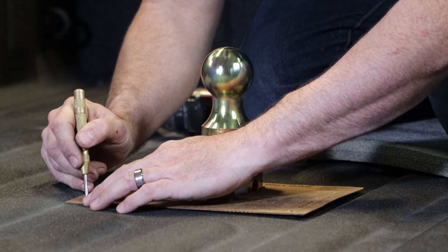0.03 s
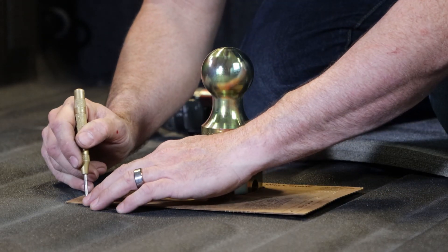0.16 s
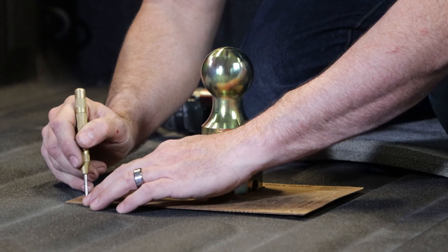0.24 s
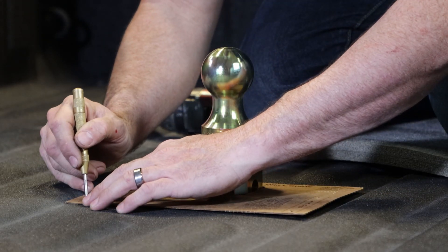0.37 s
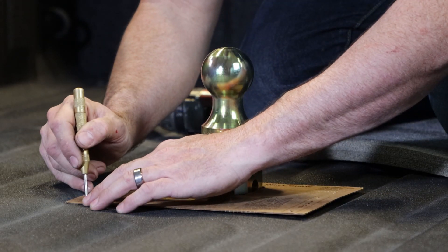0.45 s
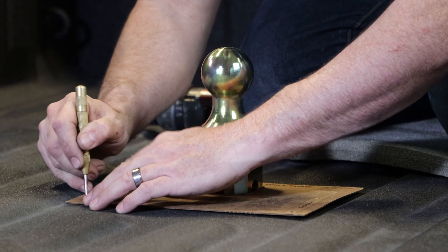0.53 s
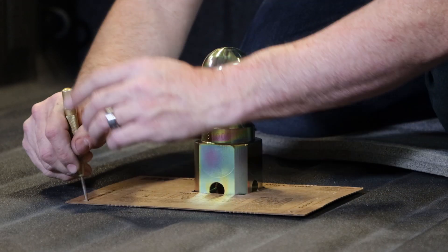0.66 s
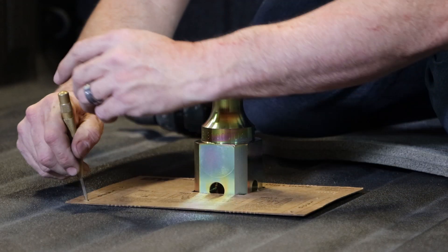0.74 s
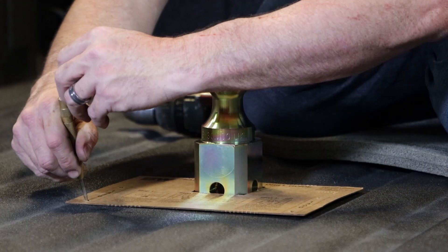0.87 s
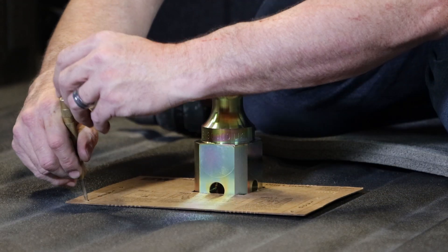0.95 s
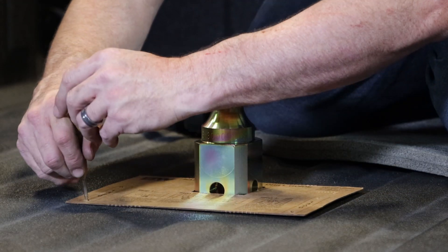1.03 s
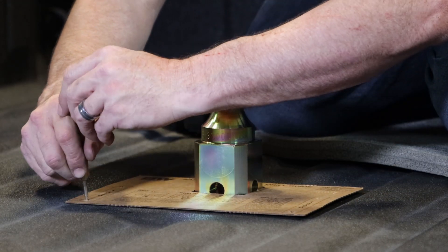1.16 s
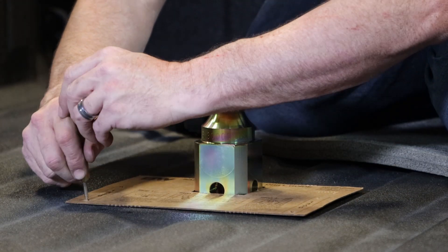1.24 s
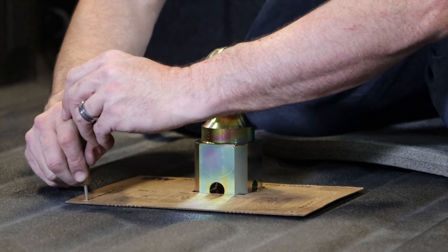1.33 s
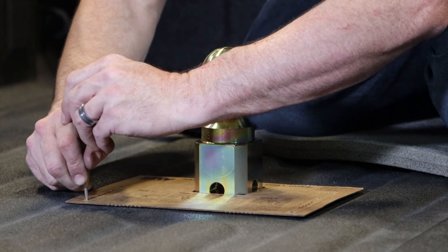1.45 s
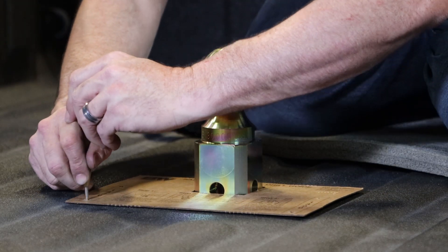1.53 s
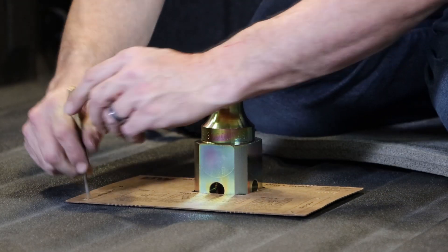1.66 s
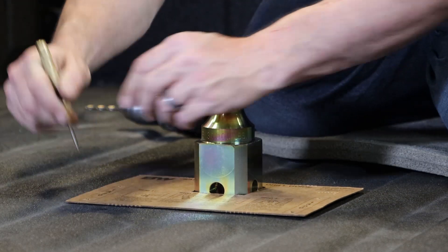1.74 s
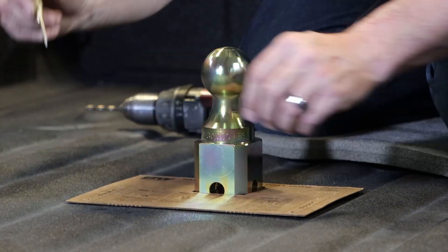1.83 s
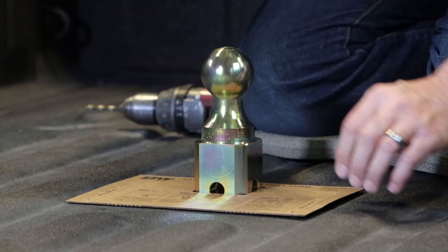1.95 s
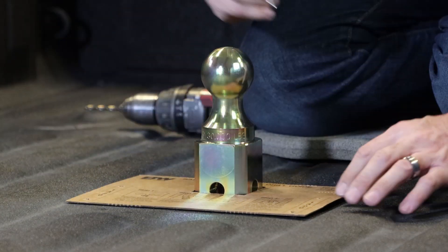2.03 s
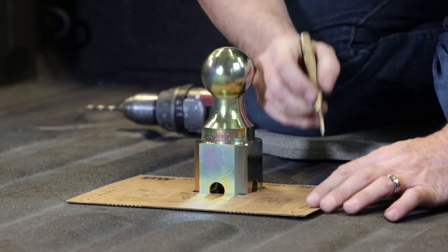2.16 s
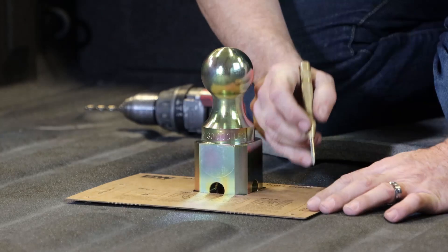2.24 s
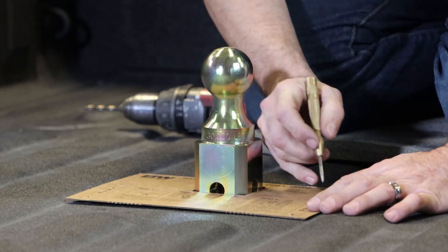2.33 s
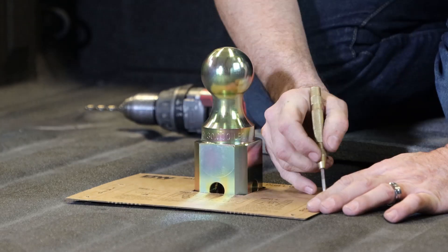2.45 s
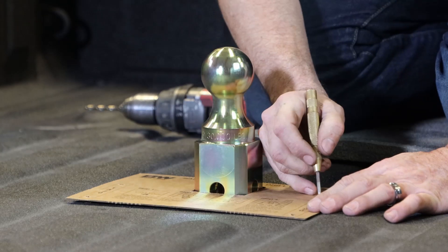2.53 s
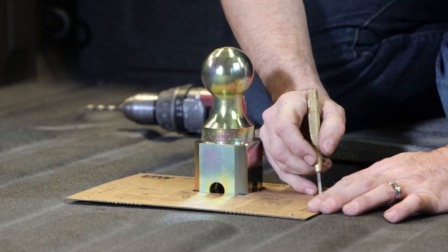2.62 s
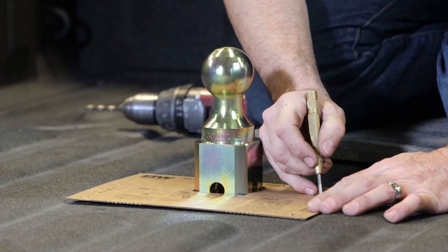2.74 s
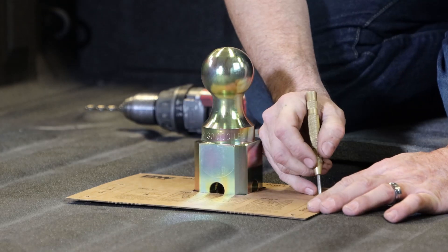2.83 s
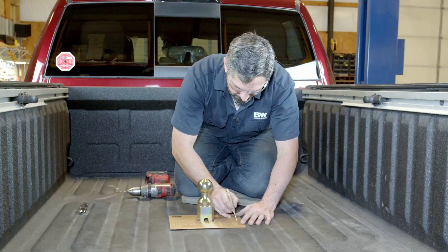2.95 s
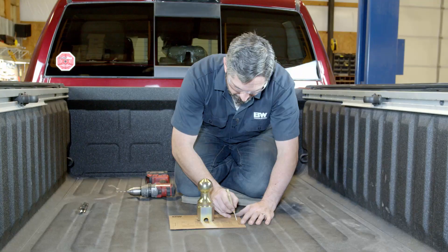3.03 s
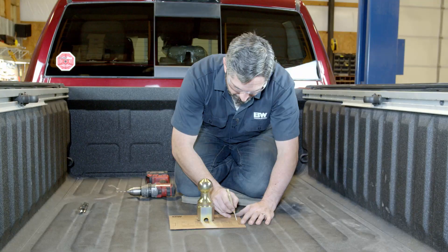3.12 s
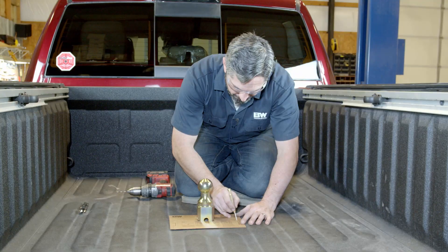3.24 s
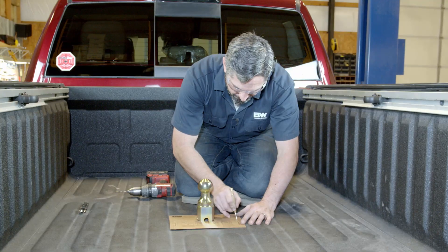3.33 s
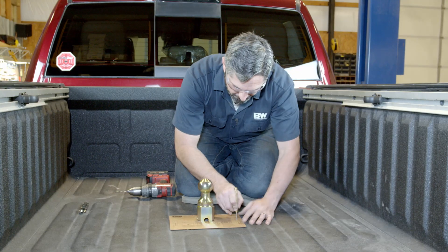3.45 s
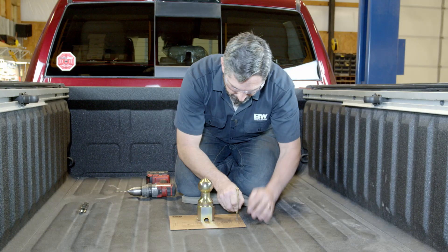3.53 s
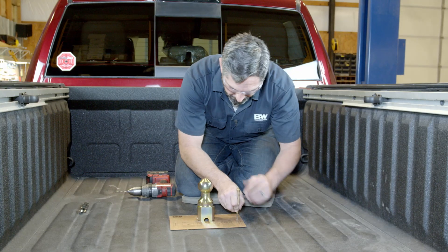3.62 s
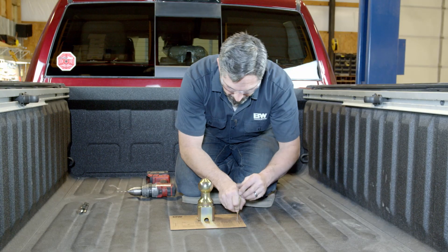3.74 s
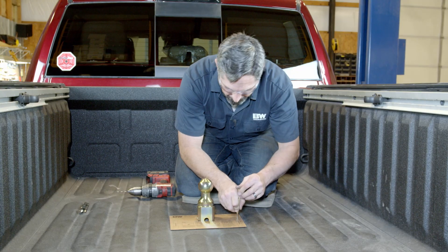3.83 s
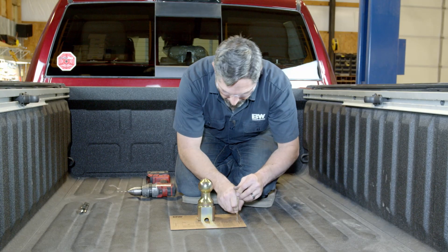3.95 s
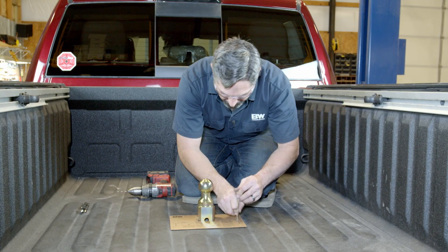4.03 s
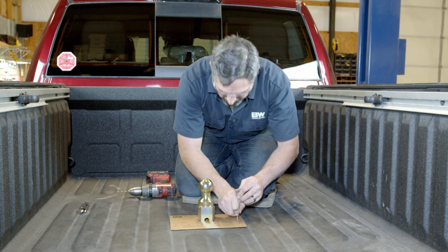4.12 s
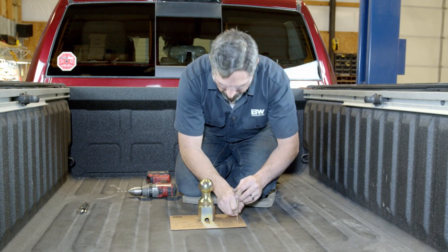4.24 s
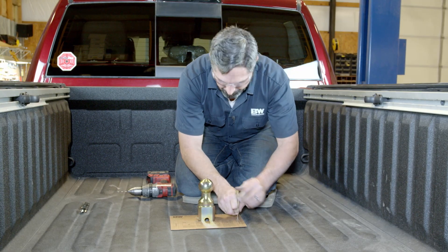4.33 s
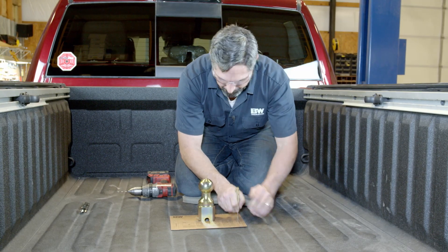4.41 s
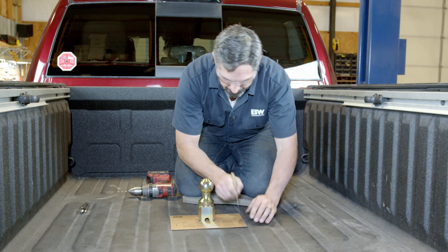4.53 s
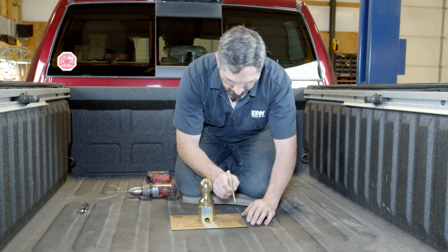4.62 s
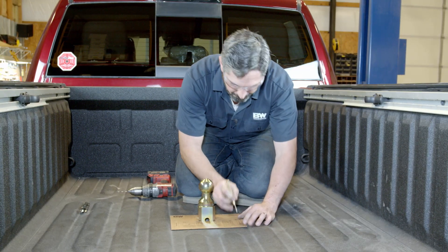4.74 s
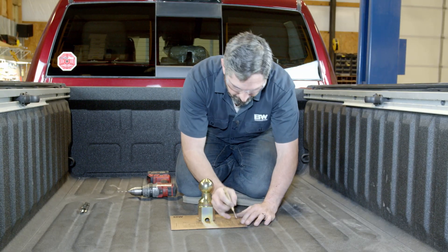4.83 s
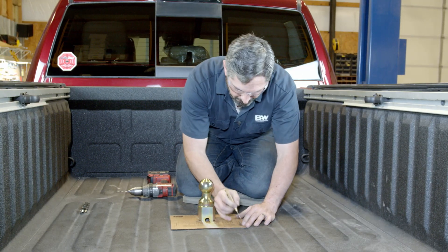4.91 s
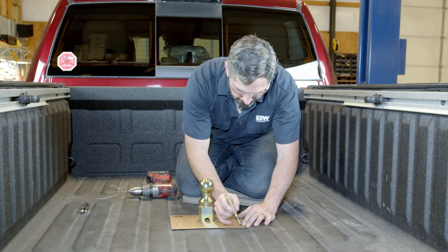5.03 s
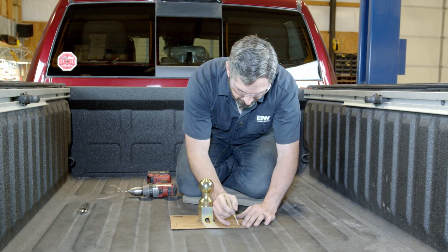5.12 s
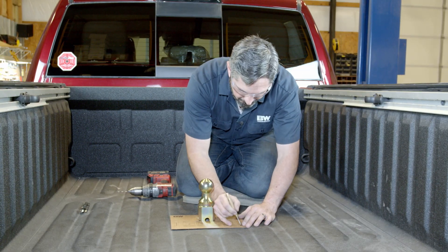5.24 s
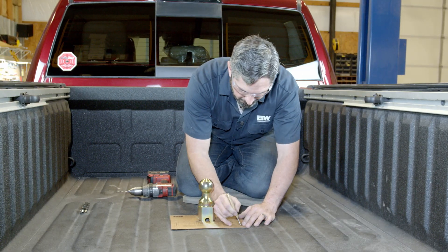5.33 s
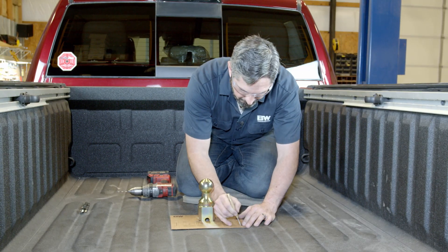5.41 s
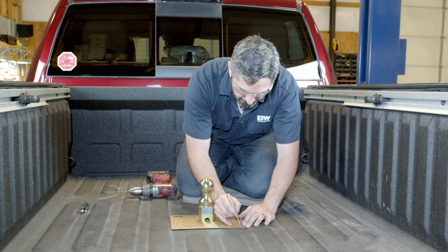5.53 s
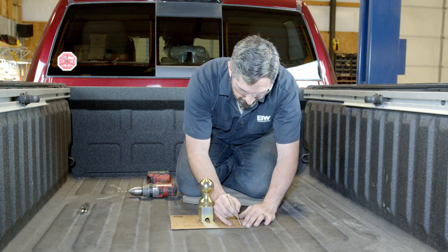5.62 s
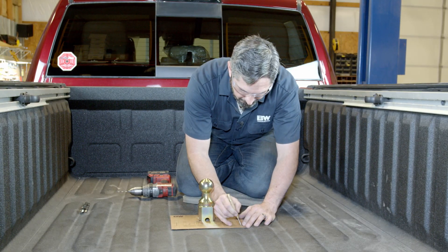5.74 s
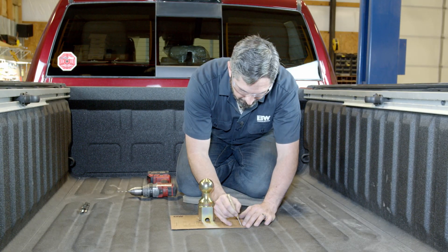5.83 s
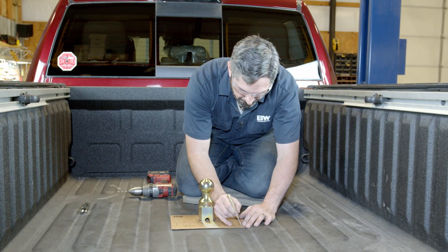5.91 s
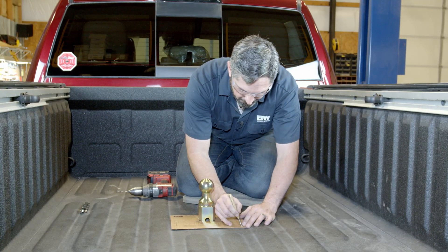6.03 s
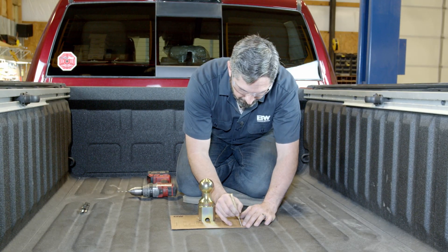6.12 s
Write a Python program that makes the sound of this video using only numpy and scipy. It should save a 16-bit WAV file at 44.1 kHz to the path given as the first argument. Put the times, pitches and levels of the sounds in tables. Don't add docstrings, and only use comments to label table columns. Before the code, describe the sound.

Close microphone in a quiet workshop with ventilation rumble, hiss and faint hum. Small touches and taps on a steel truck bed, a low groan rising as a spring loads, then a sudden bright metallic crack that overloads and echoes briefly. A firm thud and card ticks follow. After a near-quiet pause, the sequence repeats with a lower, duller crack, a lift-off thud and two rebounds, then faint rustles.

```python
import sys
import numpy as np
from scipy import signal
from scipy.fft import rfft, irfft
from scipy.io import wavfile
from scipy.ndimage import uniform_filter1d

SR = 44100
rng = np.random.default_rng(int(sys.argv[2]) if len(sys.argv) > 2 else 0)


def natural_amplitude(level_db):
    exponent = np.asarray(level_db, float) / 20
    return 10 ** exponent


def store_pcm(level_fs):
    pcm = np.round(np.clip(level_fs, -1, 1) * 32767).astype(np.int16)
    wavfile.write(sys.argv[1], SR, np.atleast_2d(pcm).T)


N = 272097

# start_s, pin_hz, pin_db, collar_hz, collar_db
BLOWS = [
    (1.4545, 5437, 0.5, 12170, -11),
    (4.1197, 4524, -1.5, 11010, -16),
]
# pitch_hz, level_db, t60_s
FIRST_SHEET = [(125, -8.5, 0.24), (228, -13.5, 0.19), (289, -10, .15), (314, -8.5, .22), (341, 0, .12),
               (492.4, 0.5, 0.15), (512, 1.5, .09), (602, -7, 0.19), (712, -10.5, .12), (917, -13.5, 0.055),
               (1005, -11, .15), (1069, -11.5, 0.12), (1403, -12.5, .11), (1787, -12, 0.15)]
SECOND_SHEET = [(29.6, -6, 0.089), (150, -7.5, 0.11), (258, -10, 0.21), (358, 1.5, .13), (402.4, -2.5, .1),
                (490.6, -3.5, 0.13), (545, -3.5, .15), (662.4, -5.5, 0.13), (701, -8.5, .1),
                (1095, -7, .11), (1161, -13, 0.091), (1349, -12.5, .14), (1439, -12, 0.056),
                (2195, -11.5, .08)]
SHEET_LEVELS = [-3, -1.74]
# centre_hz, level_db, t60_s
FIRST_CLATTER = [(40, -27, 0.13), (130, -23, 0.19), (249.2, -23, .2), (493, -16, 0.32), (1230, -8.5, 0.12),
                 (2500, -11, 0.065), (5800, -10.5, 0.06), (7200, -23, .07), (12800, -20.5, 0.053),
                 (15084, -28.5, 0.065), (17000, -49, .05)]
SECOND_CLATTER = [(40.1, -26.5, 0.18), (80, -27, 0.072), (210, -23, 0.55), (506, -14.5, 0.23),
                  (1194.3, -16.5, .14), (2500, -9, 0.1), (6300, -12.5, 0.043), (7600, -24, 0.051),
                  (12500, -23, 0.071), (14700, -28, .06), (17000, -49.5, .05)]
# pitch_hz, level_db, t60_s
NEAR_MODES = [(90, -4, .12), (181, -2.5, 0.14), (279, 2, 0.15), (358, -5.5, .12), (499, -2.5, .11),
              (583, -10, 0.11), (834, -10, 0.079), (1040, -12, 0.14), (1230, -14.5, .1), (1405, -17, .06)]
FAR_MODES = [(75, -4.5, 0.048), (155, -5.5, .22), (284, 1, .15), (368, 1, 0.25), (453, -7, 0.21),
             (554, -6, .14), (710, -11.5, .12), (767, -11, 0.097), (890, -12.5, 0.15)]
# start_s, peak_db, contact_ms, grit_db
NEAR_KNOCKS = [(.543, -44, 0.34, -35), (.588, -50.5, 0.34, -46), (.6555, -31, .1, -17),
               (.887, -48.5, 3.8, -39), (1.09, -39, .1, -31), (1.224, -46.5, .4, -40),
               (1.31, -46.5, 0.3, -29), (1.39, -39.5, .15, -30.5), (1.692, -14.5, 0.2, -21.5),
               (1.74, -27.5, 0.046, -28), (1.762, -29, 0.073, -22), (2.3, -51.5, 0.098, -26)]
FAR_KNOCKS = [
    (3.115, -58, 1, -45),
    (3.655, -48, 0.49, -45),
    (3.671, -30, 0.24, -36),
    (3.927, -43, 0.33, -17),
    (4.047, -42, 0.2, -20),
    (4.3375, -14.5, 0.24, -45),
    (4.405, -29, 0.066, -30),
    (4.458, -21, 0.3, -34),
    (4.79, -49.5, 0.46, -22),
    (4.975, -48.5, 0.27, -22.5),
]
# centre_hz, level_db, t60_s
DULL_SPREAD = [(45, -44, .1), (87.6, -30, .11), (200, -16.5, 0.5), (447, -13, 0.28), (895, -12.5, 0.21),
               (1796, -14.5, .12), (4000, -20, 0.066), (7970, -40, .05)]
# start_s, release_s, first_db, last_db
SPRING_LOADS = [
    (1.222, 1.453, -54, -43.5),
    (3.93, 4.119, -53, -36.5),
]
# start_s, peak_db, centre_hz
CARD_TICKS = [(.558, -59, 4800), (0.6343, -68, 10670), (3.674, -53, 2500), (1.6924, -46, 3490),
              (1.702, -30.5, 5670), (1.727, -47, 3480), (1.7394, -45, 4720), (1.76, -41.5, 5870),
              (1.7757, -50, 3740), (2.3245, -58, 4750), (2.4216, -55.5, 4740), (2.5111, -64, 3610),
              (2.547, -65, 3520), (3.0399, -56.5, 6900), (3.4792, -59, 4400), (4.3715, -44.5, 4613),
              (4.4094, -54, 4330), (4.4517, -38, 4530), (4.5142, -46.5, 4473), (5.0594, -67.5, 7910),
              (5.0742, -60, 5600), (5.1064, -66.5, 8090), (5.1254, -63, 5610), (5.1427, -62.5, 6000),
              (5.154, -60, 5820), (5.3394, -76, 3630), (5.6794, -73, 5650), (5.82, -61.5, 6650)]
# start_s, length_s, level_db, low_hz, high_hz
CARD_SCUFFS = [(.57, .05, -71, 3140, 9000), (1.75, .027, -53, 1490, 13920), (2.28, .047, -66, 1000, 5500),
               (4.045, .075, -65, 700, 1800), (4.39, .04, -55, 800, 3000), (4.44, .05, -54, 1500, 3400),
               (4.497, .031, -61.5, 1487, 9000), (4.5, .03, -60, 1500, 2800), (4.77, .065, -68, 3000, 8000),
               (4.955, .065, -68.5, 2500, 9000), (5.14, .04, -79, 4000, 12000)]
# centre_hz, level_db, t60_s
HALL_DECAY = [(30, -46, 0.17), (70, -36, 0.58), (146.66, -35, 0.59), (356.1, -40.5, 0.62),
              (899, -32.5, .62), (1970, -33.5, .55), (4500, -39.5, 0.74), (6600, -37, 0.46),
              (7382, -43.5, 0.44), (12100, -46.5, 0.26), (15440, -49, .2)]
# pitch_hz, level_db (per Hz)
AIR_SPECTRUM = [(12, -32), (20, -3), (46, 1.5), (214, -7.5), (246, -5.5), (418, -12.5), (481, -9),
                (636, -17), (691, -15.5), (1080, -18), (1800, -23), (6000, -35.5), (15700, -50.5)]
# pitch_hz, level_db
HUM_TONES = [(247.6, -80.5), (360.7, -82.5), (484.5, -83), (602.9, -83.5), (802.1, -89), (1082, -92),
             (1443, -95.5)]


def evened(x):
    return x / np.sqrt(np.mean(x ** 2) + 1e-30)


def add(mix, s, sound):
    part = mix[round(s * SR):][:len(sound)]
    part += sound[:len(part)]


def band(x, lo_hz, hi_hz):
    edges = np.clip([lo_hz, hi_hz], 20, SR / 2 - 500)
    return signal.sosfilt(signal.butter(2, edges, "bandpass", fs=SR, output="sos"), x)


def ring(modes, size):
    t = np.arange(size) / SR
    return sum(natural_amplitude(db - 60 * t / t60) * np.sin(2 * np.pi * hz * t) for hz, db, t60 in modes)


def dense(bands, size):
    t = np.arange(size) / SR
    log_hz = np.log(np.fft.rfftfreq(size, 1 / SR) + 1)
    spectrum = rfft(rng.standard_normal(size))
    centres = np.log([row[0] for row in bands])
    out = np.zeros(size)
    for one, (_, db, t60) in zip(np.eye(len(bands)), bands):
        share = np.sqrt(np.interp(log_hz, centres, one))
        out += natural_amplitude(db - 60 * t / t60) * evened(irfft(spectrum * share, size))
    return out


def sheet_jump(mix, s):
    push_db = -6.5
    kick = np.sin(np.linspace(0, np.pi, round(.0017 * SR))) ** 1.5
    recoil = np.sin(np.linspace(0, np.pi, round(.0033 * SR))) ** 2
    add(mix, s, natural_amplitude(push_db) * kick)
    add(mix, s + .0012, -natural_amplitude(push_db - 3) * recoil)


def hammer_blow(mix, blow, sheet, sheet_db, clatter):
    s, pin_hz, pin_db, collar_hz, collar_db = blow
    t = np.arange(40000) / SR
    sheet_jump(mix, s)
    pin = natural_amplitude(pin_db) * np.sin(2 * np.pi * pin_hz * t)
    collar = natural_amplitude(collar_db) * np.sin(2 * np.pi * collar_hz * t)
    choke = np.exp(-(t / .0023) ** 2)
    add(mix, s + .0017, (pin + collar) * choke)
    swell = 1 - np.exp(-t / .005)
    add(mix, s + .002, natural_amplitude(sheet_db) * ring(sheet, size=40000) * swell)
    add(mix, s + .0014, dense(clatter, size=40000) * (1 - np.exp(-t / .0004)))
    add(mix, s, reflections())


def knocks(rows, modes):
    out = np.zeros(N)
    t = np.arange(2000) / SR
    fill = 1 - np.exp(-np.arange(16000) / SR / .001)
    for s, db, contact_ms, grit_db in rows:
        contact_ms = max(contact_ms, .03)
        chatter = .006 / contact_ms
        hold = .85 - .0035 * max(db + 26, 0)
        chatter_noise, grit_noise = rng.standard_normal((2, 2000))

        body = ring([(hz, level, t60 * hold) for hz, level, t60 in modes], size=16000)
        body += dense([(hz, level, t60 * hold) for hz, level, t60 in DULL_SPREAD], size=16000)
        body *= fill
        contact = t * np.exp(-t * 1000 / contact_ms)
        hits = (t == 0) + chatter * chatter_noise * np.exp(-t / .014)
        force = np.convolve(hits, contact)
        thud = band(band(signal.fftconvolve(force, body), 60, 7000), 37, 9000)
        add(out, s, -natural_amplitude(db) * thud / abs(thud).max())

        grit = band(band(grit_noise, 1400, 5000), 1400, 6600)
        grit_shape = np.exp(-t / .008) * (1 - np.exp(-t / .001))
        add(out, s, natural_amplitude(db + grit_db) * grit * grit_shape)
    return out


def groan(mix, load, modes):
    start, release, first_db, last_db = load
    t = np.arange(start, release, 1 / SR)
    slips = rng.standard_normal(len(t)) * (rng.random(len(t)) < 1000 / SR)
    damped = ring([(hz, level, t60 * .33) for hz, level, t60 in modes[1:]], size=8000)
    murmur = evened(band(signal.fftconvolve(slips, damped)[:len(t)], 150, 860))
    rise = ((t - start) / (release - start)) ** 1.6
    level = natural_amplitude(first_db + (last_db - first_db) * rise)
    add(mix, start, murmur * level * signal.windows.tukey(len(t), .1))


def ticks():
    out = np.zeros(N)
    t = np.arange(1500) / SR
    for s, db, hz in CARD_TICKS:
        noise = rng.standard_normal(1500)
        tick = band(noise, hz * .8, hz * 1.25)
        if hz > 3000:
            tick += .5 * band(noise, 3000, 12000)
        tick *= natural_amplitude(-60 * t / .027)
        add(out, s, natural_amplitude(db) * tick / abs(tick).max())
    return out


def scuffs():
    out = np.zeros(N)
    for s, length, db, lo_hz, hi_hz in CARD_SCUFFS:
        noise, roughness = rng.standard_normal((2, 20000))
        grains = noise * natural_amplitude(3.4 * evened(uniform_filter1d(roughness, 60)))
        grains = grains[:round(length * SR)]
        add(out, s, natural_amplitude(db) * evened(band(grains, lo_hz, hi_hz)) * np.hanning(len(grains)))
    return out


def reflections():
    t = np.arange(SR) / SR
    return dense(HALL_DECAY, size=SR) * (1 - np.exp(-(t / .018) ** 2))


def air():
    frames = N // 256 + 5
    hz = np.fft.rfftfreq(1024, 1 / SR)
    real, imag, patches = rng.standard_normal((frames, 513, 3)).T
    patches = uniform_filter1d(patches, 10, 0)
    patches_db = evened(uniform_filter1d(patches, 16, 1))
    curve_hz, curve_db = np.transpose(AIR_SPECTRUM)
    colour_db = np.interp(np.log(hz + 1), np.log(curve_hz), curve_db)
    spectrum = (real + 1j * imag) * natural_amplitude(colour_db[:, None] + patches_db)
    return natural_amplitude(-65) * evened(signal.istft(spectrum, nperseg=1024, noverlap=768)[1][:N])


def hum():
    t = np.arange(N) / SR
    out = np.zeros(N)
    for hz, db in HUM_TONES:
        waver_db = 2.5 * np.sin(2 * np.pi * (rng.uniform(1.0, 2.7) * t + rng.random()))
        out += natural_amplitude(db + 4 + waver_db) * np.sin(2 * np.pi * hz * t)
    return out


def scene():
    bed = knocks(NEAR_KNOCKS, NEAR_MODES) + knocks(FAR_KNOCKS, FAR_MODES) + ticks() + scuffs()
    groan(bed, SPRING_LOADS[0], NEAR_MODES)
    groan(bed, SPRING_LOADS[1], FAR_MODES)
    bed += natural_amplitude(-30) * signal.fftconvolve(bed, reflections())[:N]
    hammer_blow(bed, BLOWS[0], FIRST_SHEET, SHEET_LEVELS[0], FIRST_CLATTER)
    hammer_blow(bed, BLOWS[1], SECOND_SHEET, SHEET_LEVELS[1], SECOND_CLATTER)
    return (bed + air() + hum())[None]


def low_pass(x):
    return signal.sosfilt(signal.butter(12, 15880, fs=SR, output="sos"), x)


def record(dry):
    ceiling = .99
    mix = np.clip(dry, -ceiling, ceiling)
    return low_pass(mix)


dry = scene()
out = record(dry)
store_pcm(out)
```